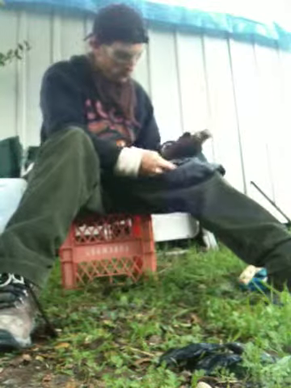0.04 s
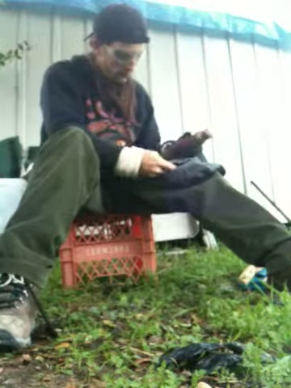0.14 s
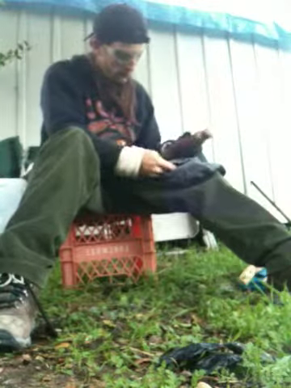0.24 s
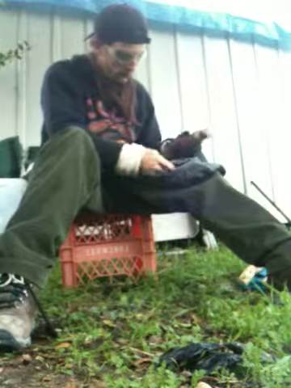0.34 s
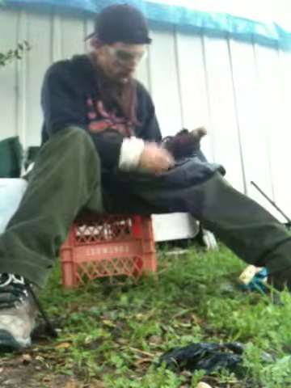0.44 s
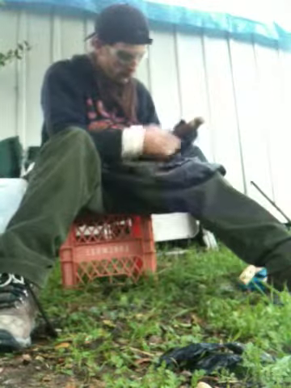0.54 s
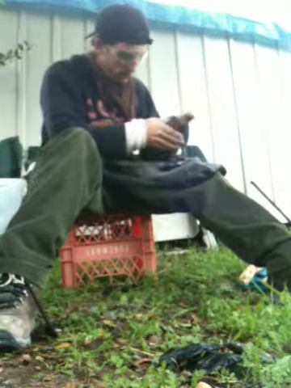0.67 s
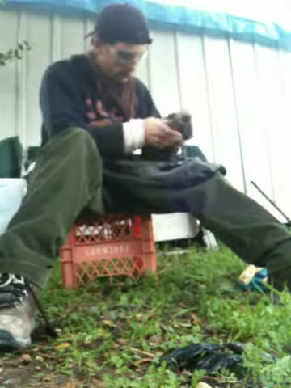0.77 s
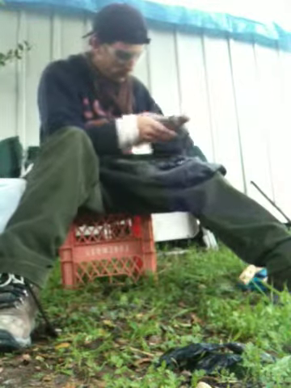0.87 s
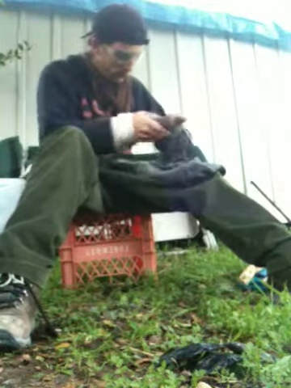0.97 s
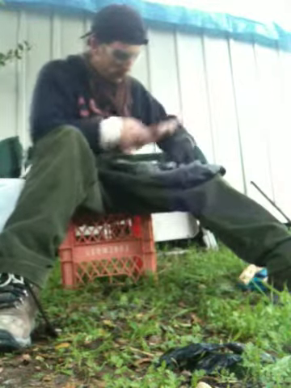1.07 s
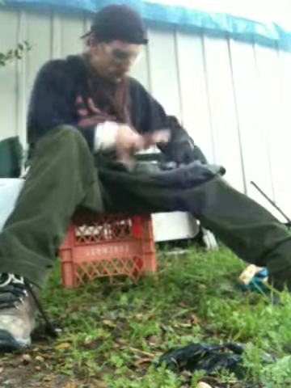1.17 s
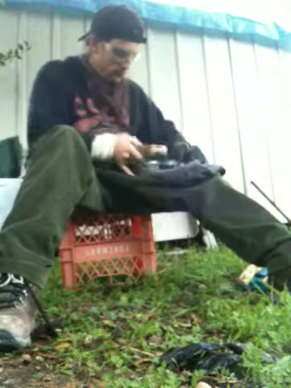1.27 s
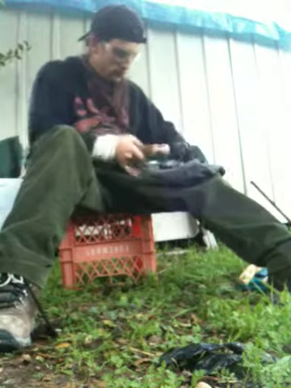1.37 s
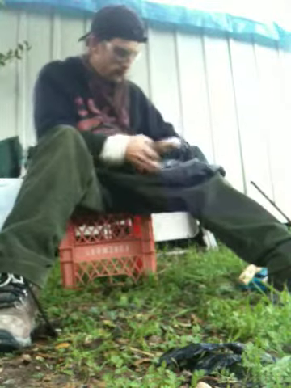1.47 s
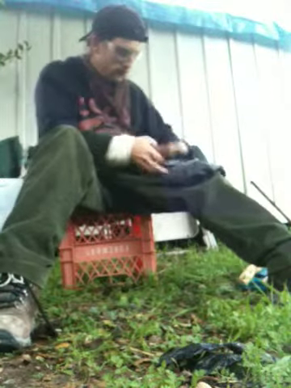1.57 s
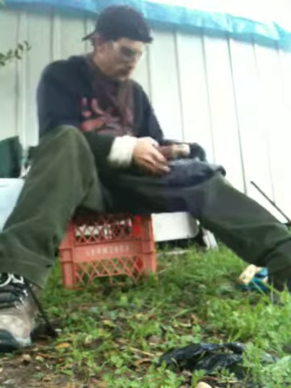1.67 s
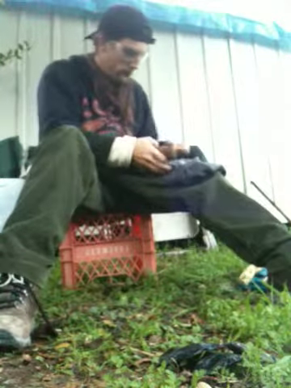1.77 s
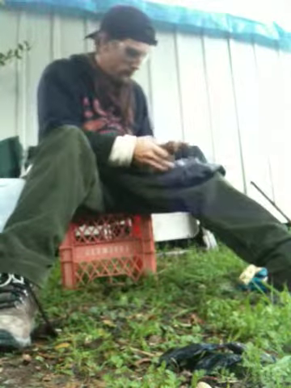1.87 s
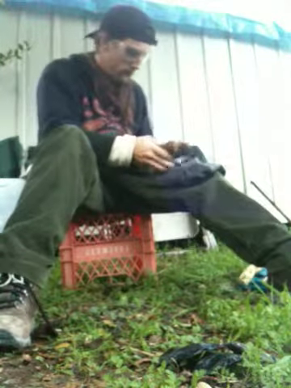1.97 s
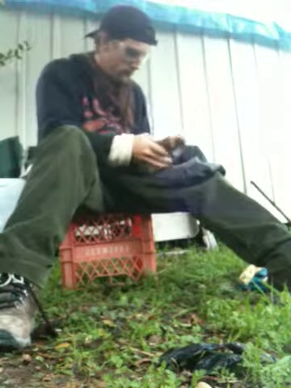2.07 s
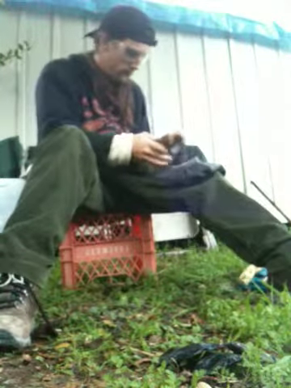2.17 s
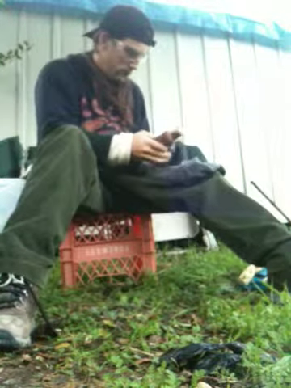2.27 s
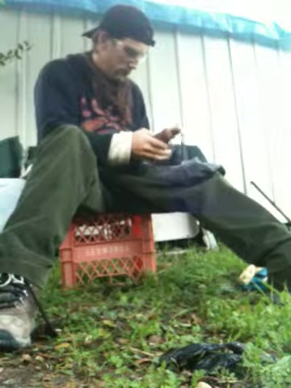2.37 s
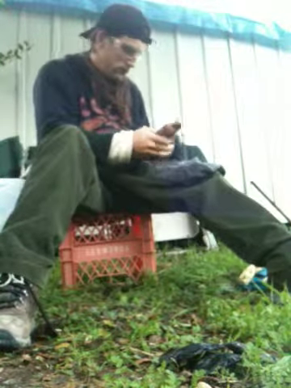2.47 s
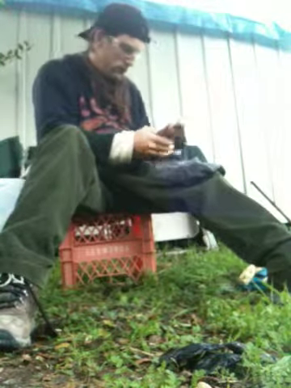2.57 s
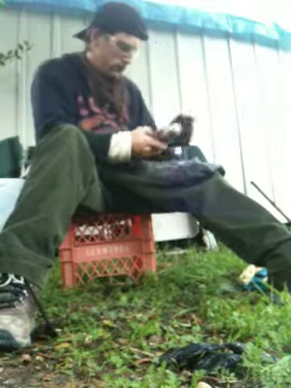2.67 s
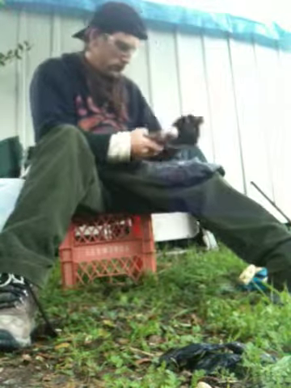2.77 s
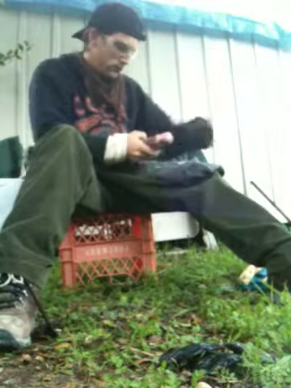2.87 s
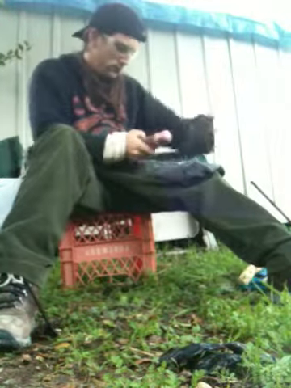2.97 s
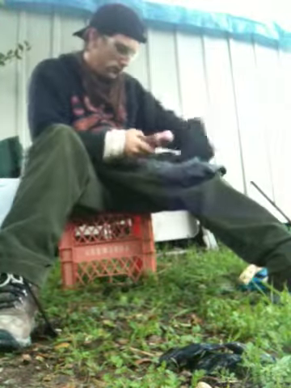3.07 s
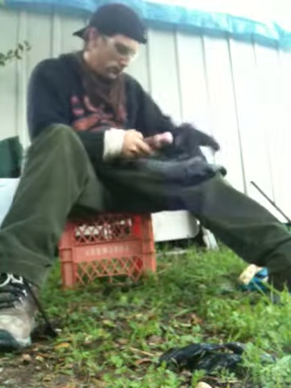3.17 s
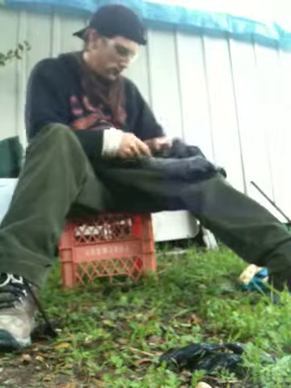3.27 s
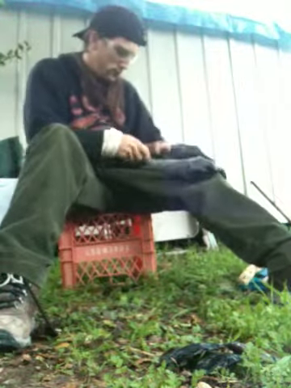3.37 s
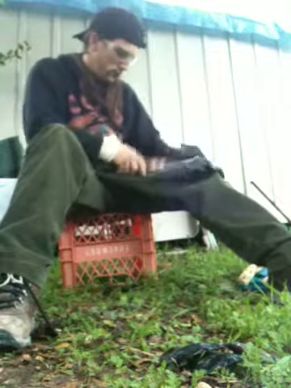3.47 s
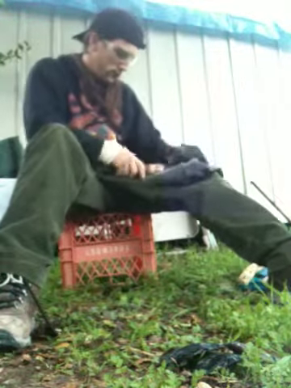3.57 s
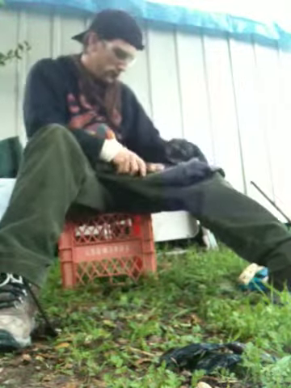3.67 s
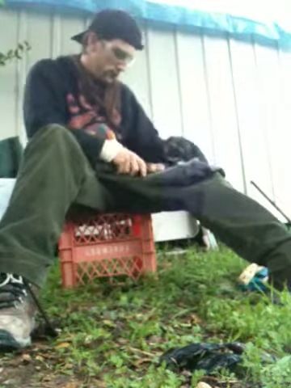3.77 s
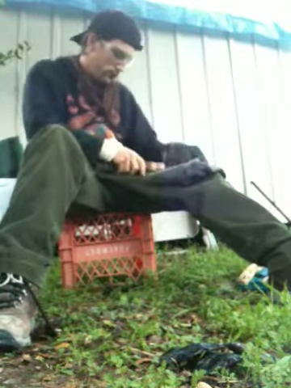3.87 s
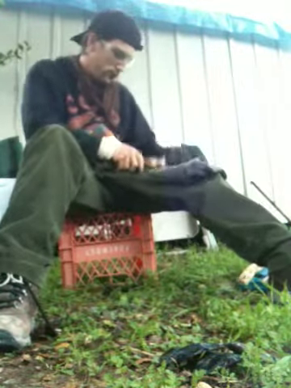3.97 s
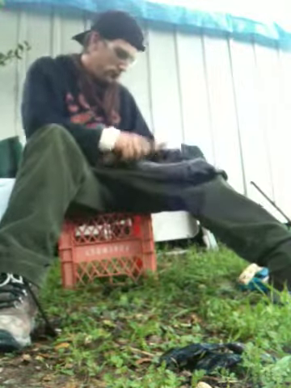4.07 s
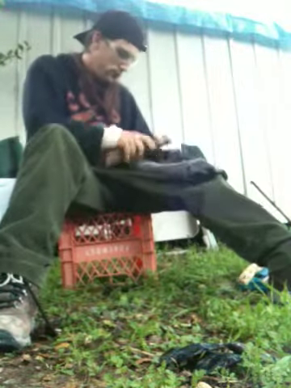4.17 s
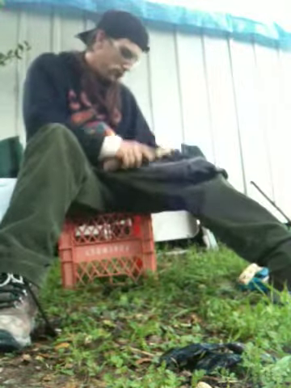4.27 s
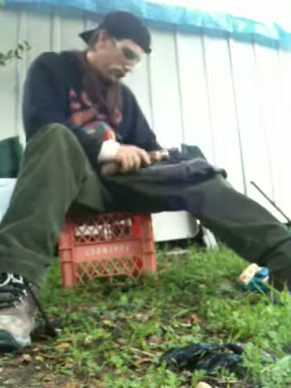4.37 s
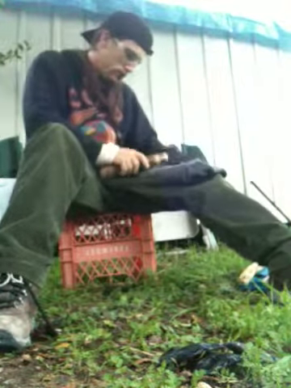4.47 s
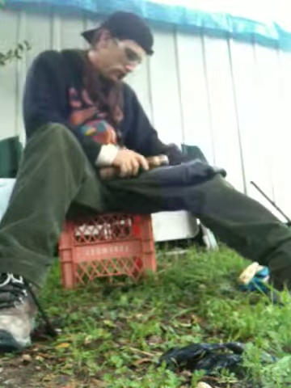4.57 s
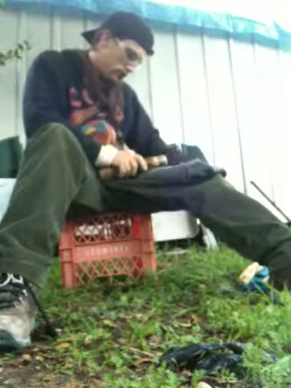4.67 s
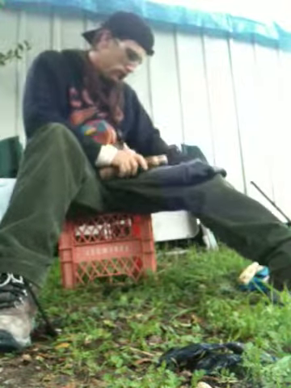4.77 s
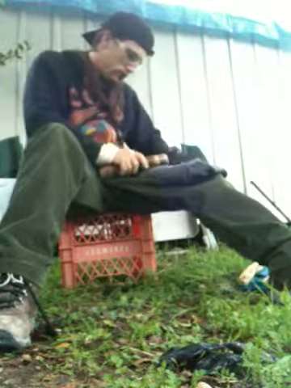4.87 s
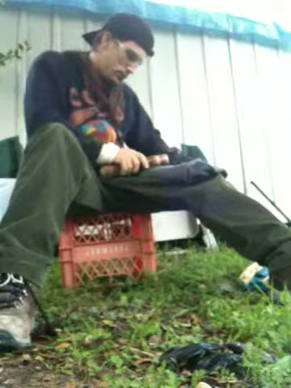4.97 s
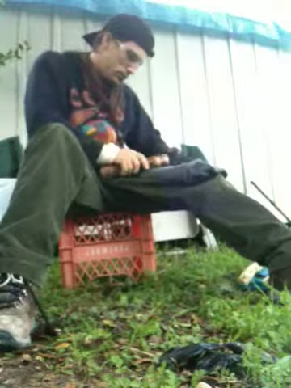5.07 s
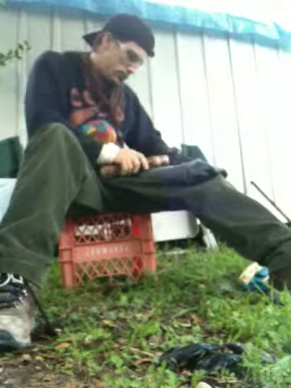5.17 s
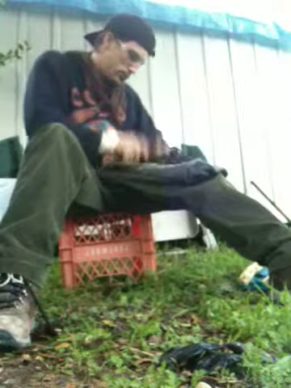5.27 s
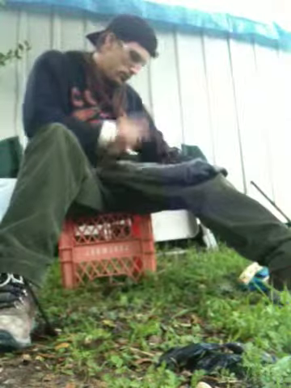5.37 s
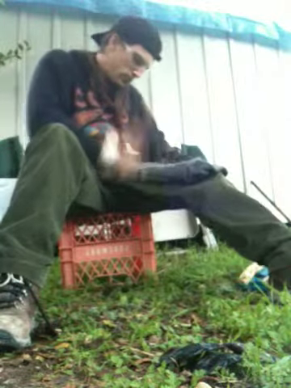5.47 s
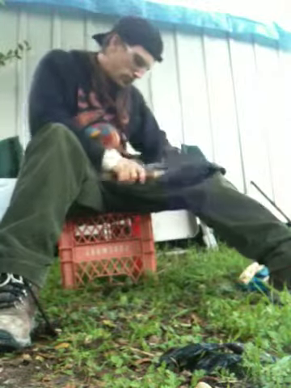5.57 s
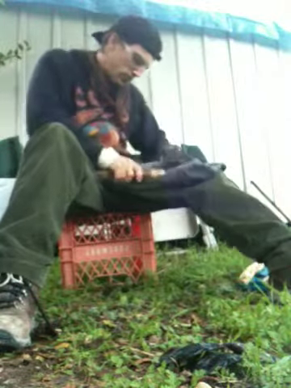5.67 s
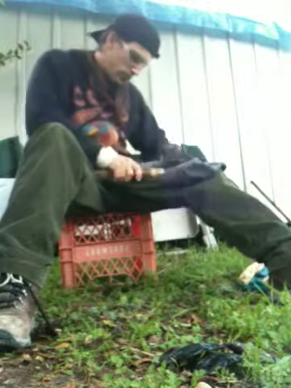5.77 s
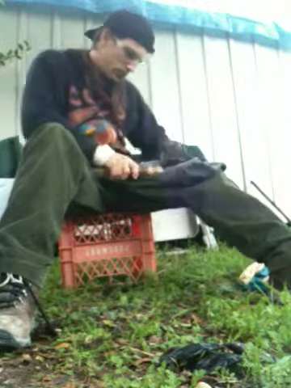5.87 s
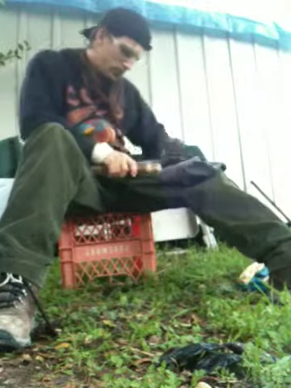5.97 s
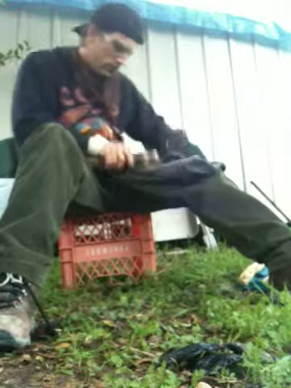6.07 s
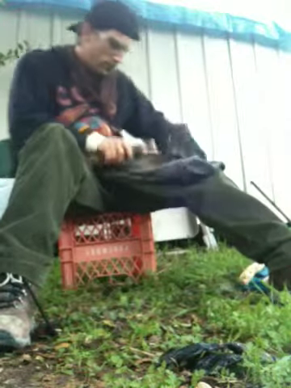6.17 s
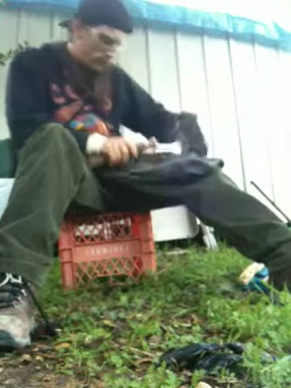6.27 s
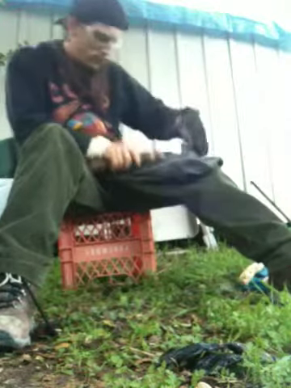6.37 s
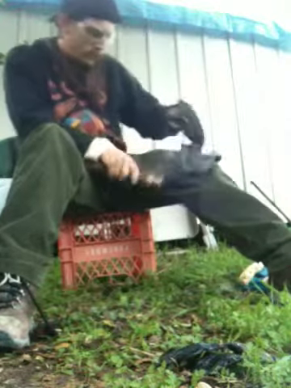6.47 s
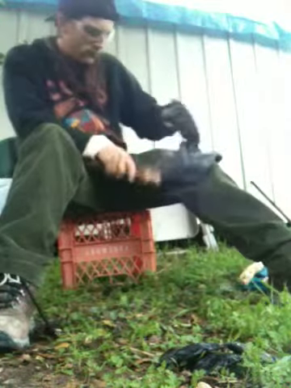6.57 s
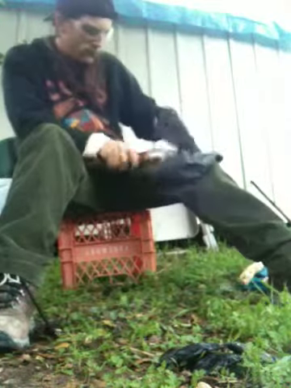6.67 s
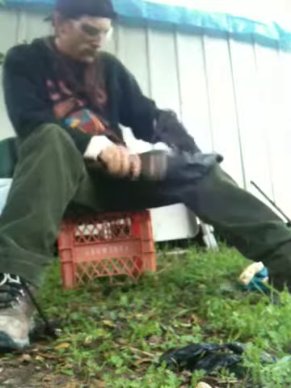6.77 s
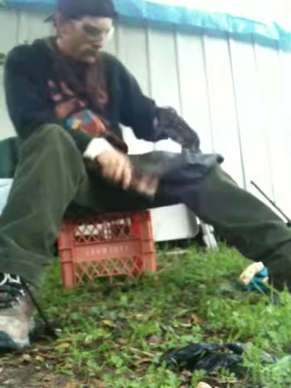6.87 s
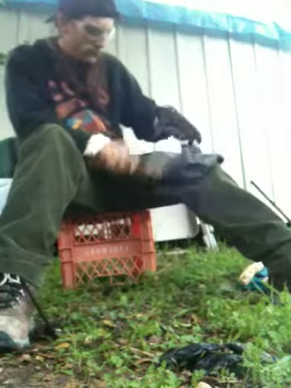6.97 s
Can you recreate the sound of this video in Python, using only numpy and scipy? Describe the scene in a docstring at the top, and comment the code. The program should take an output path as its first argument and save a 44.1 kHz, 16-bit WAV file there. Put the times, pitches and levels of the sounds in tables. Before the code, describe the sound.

A quiet yard with a very low distant town rumble and faint hiss. From 0 to 1.5 seconds, thin raspy rising bird tsips mingle with soft leather rustling and faint dull knocks near 0.3 and 0.4. A far bird gives hoarse yelps at about 1.6, 2.0, 2.6 and 3.1; bright swooping notes come around 2.2, chirps at 2.8 and 2.9, and two stronger ones near 3.8 and 4.0. Rubbing fades by 4.6, when a dull tap lands on stone, then a fainter one at 5.15. At 5.62 comes a single loud, dry, sharp crack with a rapid brittle splintering and short yard echo. Small glassy clinks follow to 5.8, faint grating near 5.9 to 6.1. From 6.27 a long wavering bird whistle falls to the end, over ringing clinks and high scrapes at 6.5 to 6.7 and a final scrape and dull knock near 7.0.

```python
"""A quiet yard, where a knapper sits with a piece of obsidian on a leather pad on his thigh.
He taps the edge twice with a billet, strikes off a flake with one sharp crack, then slides the ringing flake free.
Struck stone is a sum of damped modes; fracture, sliding and leather are shaped noise.
Small birds chirp and whistle and a far bird yelps, as tones on moving pitches, over filtered noise for a low town
rumble. Delayed copies and decaying noise tails return the sounds from ground, shed wall, fence and plants."""
import sys
import numpy as np
from scipy import signal
from scipy.fft import rfft, irfft
from scipy.io import wavfile

SR = 44100
rng = np.random.default_rng(int(sys.argv[2]) if len(sys.argv) > 2 else 0)


def master(y):
    """Save y as 16-bit WAV."""
    cut = np.clip(np.atleast_2d(y).T, -1, 1)
    pcm = np.round(cut * 32767)  # scale
    wavfile.write(sys.argv[1], SR, pcm.astype(np.int16))


N = 310023  # length [samples]
TIME = np.arange(N) / SR  # [s]


def amp(db):
    """Level to amplitude: 20 dB is a factor of ten."""
    return 10 ** (np.asarray(db) / 20)


def unit(x):
    """Normalise the mean power: rms becomes 1."""
    return x / np.sqrt(np.mean(x ** 2))


def add(track, s, x):
    """Superposition: mix x into the track from s seconds on."""
    i = int(s * SR)
    track[i:i + len(x)] += x[:N - i]


def fade(t, t60):
    """Exponential decay, 60 dB in t60 seconds."""
    return np.exp(-np.log(1000) * t / t60)


def colour(x, points):
    """Minimum-phase filter of unit energy whose gain follows (frequency [Hz], level [dB]) points."""
    hz, db = np.transpose(points)
    grid_hz = np.fft.rfftfreq(8192, 1 / SR)
    gain_db = np.interp(np.log(grid_hz + 1), np.log(hz), db)
    cepstrum = irfft(np.log(amp(gain_db)))
    half = len(cepstrum) // 2
    # folding the cepstrum onto positive times makes the response causal
    folded = np.r_[cepstrum[0], 2 * cepstrum[1:half], np.zeros(half)]
    response = irfft(np.exp(rfft(folded)))
    return signal.fftconvolve(x, response / np.linalg.norm(response))[:len(x)]


def lowpass(x, hz):
    """Second-order low-pass: 12 dB an octave above hz."""
    return signal.sosfilt(signal.butter(2, hz, fs=SR, output="sos"), x)


def bandpass(x, order, low_hz, high_hz):
    """Butterworth band-pass: flat between the corners, falling outside them."""
    return signal.sosfilt(signal.butter(order, [low_hz, high_hz], "band", fs=SR, output="sos"), x)


def wander(t, rate):
    """Random modulation, slow or fast: normal values, rate of them a second, joined by lines."""
    return np.interp(t * rate, np.arange(4096), rng.standard_normal(4096))


def phase(hz):
    """Phase is the running integral of frequency."""
    return 2 * np.pi * np.cumsum(hz) / SR


def town(level_db=-63.5):
    """Many distant sources sum to steady noise: a low rumble with a faint hiss above it."""
    # spectrum of the town: (frequency [Hz], level [dB])
    town_spectrum = [(15, -80), (25, -53.5), (69, -20.5), (104, -2.5), (178, 0), (221, -5), (253, -2),
                     (399, -12), (722, -17), (997, -22), (1140, -21.5), (4620, -30), (7100, -27),
                     (8810, -31.5), (15500, -33.5)]
    return amp(level_db) * unit(colour(rng.standard_normal(N), town_spectrum))


def leather_pad(handling_db=-78.5, flutter_db=2.0):
    """Friction on leather is coloured noise; its damping makes every knock a dull, decaying noise band."""
    # spectrum of rubbed leather: (frequency [Hz], level [dB])
    leather = [(800, -10), (2500, -16), (4500, 2), (6500, 2.5), (9000, -5.5), (12000, -0.5), (15500, -13)]
    # strokes of hand and glove: (middle [s], length between 1/e points [s], level at the middle [dB])
    strokes = [(0.824, 0.041, -71.5), (1.15, 0.13, -68), (1.582, 0.64, -74), (2.747, 0.27, -71.5),
               (3.195, 0.27, -70), (3.484, 0.28, -73), (5.494, .04, -69), (6.38, 0.16, -76.5)]
    # dull knocks of stone and billet: (time [s], starting level [dB], nominal frequency [Hz], t60 [s])
    knocks = [(.287, -64.5, 1400, 0.19), (.432, -63.5, 640, 0.42), (1.552, -60.5, 540, 0.071),
              (6.982, -51.5, 597, 0.039)]

    # a faint rustle lies between the strokes; it stops while he aims and strikes
    moving = 1.0 * ((TIME < 4.6) | (TIME > 6.0))
    handling = amp(handling_db) * lowpass(moving, 14)
    stroking = sum(amp(db) * np.exp(-(2 * (TIME - s) / length) ** 2) for s, length, db in strokes)
    envelope = np.hypot(handling, stroking) * amp(flutter_db * wander(TIME, 70))
    out = colour(rng.standard_normal(N), leather) * envelope

    t = TIME[:SR // 4]
    for s, db, hz, t60 in knocks:
        band = bandpass(rng.standard_normal(len(t)), 1, hz / 3, hz * 1.2)
        add(out, s, amp(db) * fade(t, t60) * unit(lowpass(band, 2 * hz)))
    return out


def progress(length):
    """Normalised time, from 0 to 1 over a note."""
    return TIME[:int(length * SR)] / length


def arc(length, drop):
    """Parabolic pitch factor that rises to 1 and falls back."""
    return 1 - drop * (2 * progress(length) - 1) ** 2


def note(hz, rasp, rasp_depth=0.107, rasp_rate=1000, flutter_db=2):
    """Frequency modulation of a near-sine: rasp shakes the pitch fast and at random."""
    t = TIME[:len(hz)]
    turn = phase(hz * (1 + rasp_depth * rasp * wander(t, rasp_rate)))
    swell = np.sqrt(2 * np.sin(np.pi * np.arange(len(t)) / len(t)))
    return swell * amp(flutter_db * wander(t, 222)) * np.sin(turn)


def songbirds(tsip_echo_db=-9, swoop_echo_db=-15):
    """Distance sets the ratio of direct to scattered sound: returns notes and their share fed to the echo."""
    # thin, raspy rising calls: (time [s], length [s], level [dB])
    tsip_calls = [(.15, .05, -73), (.32, .033, -72.5), (0.427, 0.023, -69.5), (.54, .024, -73.5),
                  (1.02, 0.064, -71), (1.337, 0.019, -68), (1.434, 0.022, -66.5)]
    # notes that swoop down and turn up: (time [s], length [s], lowest pitch [Hz], level [dB], rasp [0-1])
    swoop_notes = [(1.972, .05, 5500, -64.5, 0.27), (2.189, .07, 6200, -58, .05),
                   (2.219, .068, 7130, -52.5, 0.1), (2.209, .09, 7850, -57, 0.53),
                   (5.555, .04, 5050, -66, .3)]
    # arched tones: two chirps alone, then two close chirps, near 3.83 and 4.0 s, each of several overlapping tones:
    # (time [s], length [s], top pitch [Hz], drop at the ends [0-1], middle level [dB], rasp [0-1], echo [dB])
    chirp_tones = [(2.785, 0.043, 3770, 0.27, -60, .15, -9), (2.925, 0.048, 3500, 0.34, -65, 0.4, -5),
                   (3.828, 0.1, 6720, .16, -56.5, 0.19, -5.5), (3.852, .11, 5060, .05, -72, 1, 1),
                   (3.908, .08, 6600, .03, -69, 0.45, -6), (3.982, 0.035, 4800, 0.06, -66.5, .6, 6),
                   (3.992, 0.023, 7200, 0, -65, 0.2, -3), (4.004, .03, 5950, .04, -57.5, .2, -3),
                   (4.008, .08, 7750, 0.3, -62.5, 0.23, -4), (4.007, .068, 3460, 0.4, -71, 0.27, 3),
                   (4.044, 0.11, 5380, .08, -70.5, 1, 4.5)]
    tsip_hz, tsip_rise_octaves = 6860, 0.335  # pitch half way, and the whole climb
    swoop_turn, swoop_bend = 0.65, 0.36  # share of the note at the turn; pitch rise per squared share from there
    chirp_fall_db = 6  # each tone starts strong and weakens by this much

    tsips, swoops, chirps, chirp_echo = np.zeros((4, N))
    for s, length, db in tsip_calls:
        pitch = tsip_hz * 2 ** (tsip_rise_octaves * (progress(length) - 0.5))
        add(tsips, s, amp(db) * note(pitch, rasp=0.75))
    for s, length, hz, db, rasp in swoop_notes:
        pitch = hz * (1 + swoop_bend * (progress(length) - swoop_turn) ** 2)
        add(swoops, s, amp(db) * note(pitch, rasp))
    for s, length, hz, drop, db, rasp, echo_db in chirp_tones:
        level = amp(db - chirp_fall_db * (progress(length) - 0.5))
        tone = level * note(hz * arc(length, drop), rasp)
        add(chirps, s, tone)
        add(chirp_echo, s, amp(echo_db) * tone)
    echo_feed = amp(tsip_echo_db) * tsips + amp(swoop_echo_db) * swoops + chirp_echo
    return tsips + swoops + chirps, echo_feed


def yelping_bird(jitter=0.024, jitter_rate=500, flutter_db=2):
    """Source and filter: hoarse partials on an arched pitch pass a throat that favours 1.2 to 2.3 kHz."""
    # four yelps: (time [s], length [s], top of the fundamental [Hz], level before the throat [dB])
    yelps = [(1.626, 0.11, 623, -67), (2.026, 0.12, 642, -65.5), (2.561, 0.11, 626, -67),
             (3.113, .13, 622, -65.5)]
    # partials, the fundamental itself being absent: (multiple of the fundamental, level [dB])
    partials = [(2, 0), (3, 1), (5, -6)]
    out = np.zeros(N)
    for s, length, top_hz, db in yelps:
        t = TIME[:int(length * SR)]
        u = t / length
        arch = 1 - 0.95 * (u - 0.43) ** 2
        turn = phase(top_hz * (arch + jitter * wander(t, jitter_rate)))
        voice = sum(amp(part_db) * np.sin(round(k) * turn) for k, part_db in partials)
        swell = np.sqrt(np.sin(np.pi * u))
        add(out, s, amp(db + flutter_db * wander(t, 200)) * swell * unit(voice))
    return bandpass(out, 2, 1200, 2300)


def ring(modes, t, build=0.77):
    """Modal superposition: damped cosines after one blow, each swelling over its first cycles."""
    out = np.zeros(len(t))
    for hz, db, t60 in modes:
        swell = 1 - np.exp(-(hz * t / (2 * build)) ** 2)
        out += amp(db) * np.cos(2 * np.pi * hz * t) * swell * fade(t, t60)
    return out


def billet(gain_db=2):
    """Impact excites modes: a lighter touch sounds duller and hardly moves the padded thigh."""
    # two aiming taps and the blow, all raised by gain_db:
    # (time [s], level [dB], contact low-pass [Hz], thud of the padded thigh [dB])
    blows = [(4.6202, -22, 1250, -16), (5.150, -32, 800, -14), (5.6227, 0, 14000, 0)]
    # billet and core ringing together, damped by the hands: (frequency [Hz], level [dB], t60 [s])
    blow_modes = [(924, -24, 0.017), (1010, -24.5, 0.038), (1630, -29, 0.017), (1735, -31.5, 0.014),
                  (2883, -32, 0.026), (3850, -9.5, 0.011), (4020, -10, 0.01), (4390, -4, 0.0079),
                  (5130, -9, 0.0098), (6290, -15, 0.015), (8360, -18, 0.0096), (11480, -14, 0.005)]
    # the padded thigh under the core: (frequency [Hz], level [dB], t60 [s])
    thud_modes = [(195, -25.5, 0.041), (297, -27, 0.046), (536, -21.5, 0.022), (876, -36.5, 0.06)]
    out, t = np.zeros(N), TIME[:SR // 2]
    crack, thud = ring(blow_modes, t), ring(thud_modes, t)
    for s, db, bright_hz, thud_db in blows:
        add(out, s, amp(db + gain_db) * lowpass(crack + amp(thud_db) * thud, bright_hz))
    return out


def grate(length, ring_db, tilt_db, grain_db=6.0):
    """Noise-driven resonance: tiny fractures and slips set the flake ringing, tilted by tilt_db an octave."""
    # the thin flake, before the tilt: (frequency [Hz], level [dB], t60 [s])
    flake_modes = [(7270, 8.5, 0.14), (7460, -12.5, .1), (9900, -20.5, .15), (14530, -1, 0.16),
                   (14120, -0.5, .05), (14750, -5.5, .02)]
    # spectrum of stone grinding on stone: (frequency [Hz], level [dB])
    grit = [(50, -44.5), (300, -23.5), (1000, -18), (2400, -25.5), (3100, -20), (3700, -8.5), (6100, -2.5),
            (7800, -4.5), (9200, -8.5), (11800, -5), (13300, -11), (15500, -15)]
    t = TIME[:SR // 2]
    pressure = (1 - np.exp(-10 * t / length)) * np.exp(-(t / length) ** 2)
    grains = amp(grain_db * np.minimum(rng.exponential(size=len(t)), 4))
    slips = pressure * unit(rng.standard_normal(len(t)) * grains)

    pivot_hz = flake_modes[0][0]
    tilted = [(hz, db + tilt_db * np.log2(hz / pivot_hz), t60) for hz, db, t60 in flake_modes]
    # the ringing is levelled against the slips that drive it
    singing = unit(signal.fftconvolve(slips, ring(tilted, t))[:len(t)]) * slips.std()
    return colour(slips, grit) + amp(ring_db) * singing


def obsidian():
    """Brittle fracture, then stick and slip: the stone breaks, the flake clinks on the core and slides free."""
    # the break runs through the stone in quick bursts: (time [s], length [s], level [dB])
    fractures = [(5.6227, .0022, -14), (5.6283, .003, -22.5), (5.6355, .008, -24.5), (5.646, .012, -35),
                 (5.6603, .002, -30)]
    # the loose flake drops against the core and rings low: (time [s], length [s], level [dB], flake ring [dB])
    clinks = [(5.678, 0.0063, -44.5, -0.5), (5.762, .018, -47.5, 5), (5.792, 0.029, -63.5, 8),
              (6.508, .015, -53.5, -3), (6.676, 0.01, -54.5, -6), (6.712, 0.051, -78.5, 13),
              (6.98, .007, -52.5, -20)]
    # its edge grates along the core and rings high: (time [s], length [s], level [dB], flake ring [dB])
    slides = [(5.927, 0.078, -62, -7), (6.073, 0.028, -67, -13), (6.504, 0.04, -55, -6),
              (6.554, .056, -60.5, -4), (6.61, 0.019, -56, 5.5), (6.647, .031, -64, 2),
              (6.868, 0.025, -63.5, -19), (6.991, .047, -60.5, -22)]
    out = np.zeros(N)
    for s, length, db in fractures:
        add(out, s, amp(db) * grate(length, ring_db=-13, tilt_db=3))
    for s, length, db, ring_db in clinks:
        add(out, s, amp(db) * grate(length, ring_db, tilt_db=-9))
    for s, length, db, ring_db in slides:
        add(out, s, amp(db) * grate(length, ring_db, tilt_db=16.5))
    return out


def whistling_bird(gain_db=1.5, waver=0.0033, flutter_db=3.0):
    """A pure tone on a gliding frequency: one long falling whistle, slightly wavering."""
    # path of the whistle, its levels raised by gain_db: (time [s], pitch [Hz], level [dB])
    whistle = [(6.272, 6370, -60), (6.338, 5950, -58.5), (6.406, 5590, -57.5), (6.489, 5340, -62.5),
               (6.616, 5022, -57.5), (6.742, 4983, -52), (6.81, 4960, -58.5), (6.93, 4885, -59),
               (7.03, 4700, -57.5)]
    s, hz, db = np.transpose(whistle)
    pitch = np.interp(TIME, s, hz) * (1 + waver * wander(TIME, 120))
    onset = np.clip((TIME - s[0]) / 0.011, 0, 1)
    level = amp(np.interp(TIME, s, db) + gain_db + flutter_db * wander(TIME, 60))
    return onset * level * np.sin(phase(pitch))


def scatter(x, db, t60, delay):
    """Diffuse reflection: convolution with a decaying noise tail, as from walls, fence and plants."""
    # spectrum of the returns: (frequency [Hz], level [dB])
    scatter_spectrum = [(100, -8.5), (500, -9), (1050, -8), (1700, -3), (3300, -7), (4200, -7), (6000, 2),
                        (8000, 3.5), (11000, -4), (15500, -11.5)]
    t = TIME[:SR]
    build_up = np.clip(t / delay - 0.5, 0, 1)
    tail = colour(rng.standard_normal(SR) * fade(t, t60) * build_up, scatter_spectrum)
    return amp(db) * signal.fftconvolve(x, tail / np.linalg.norm(tail))[:N]


def yard(x):
    """Specular and diffuse reflection: a few distinct echoes, a quick scatter and a faint long tail."""
    # ground, shed wall and fence: (delay [s], level [dB])
    reflections = [(.0019, -14), (.0055, -16.5), (0.0152, -29.5), (0.0173, -29.5)]
    echoes = sum(amp(db) * np.interp(TIME - delay, TIME, x, left=0) for delay, db in reflections)
    quick = scatter(x, db=-12.5, t60=0.14, delay=0.0074)
    lingering = scatter(x, db=-24.5, t60=0.47, delay=0.039)
    return x + echoes + quick + lingering


def scene():
    """Superposition of fields: the work close by, the birds further off and more reverberant."""
    notes, note_echo = songbirds()
    calls = whistling_bird() + yelping_bird()
    bird_echo = scatter(note_echo + amp(-5.5) * calls, db=-0.5, t60=0.61, delay=0.004)
    work = yard(billet() + obsidian() + leather_pad())
    return (work + notes + calls + bird_echo + town())[None]


def record(dry, ceiling=0.95, top_hz=15800):
    """Soft saturation rounds peaks near the ceiling; a steep elliptic low-pass then cuts above top_hz."""
    rounded = dry / (1 + (dry / ceiling) ** 4) ** (1 / 4)
    return signal.sosfilt(signal.ellip(8, 0.2, 70, top_hz, fs=SR, output="sos"), rounded)


dry = scene()
out = record(dry)
master(out)
```